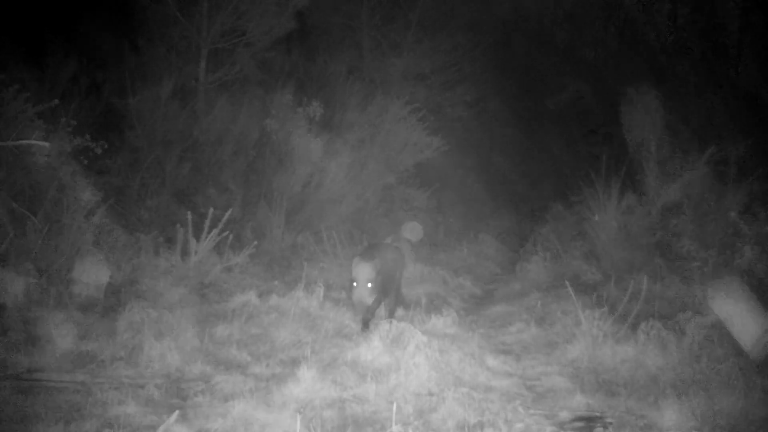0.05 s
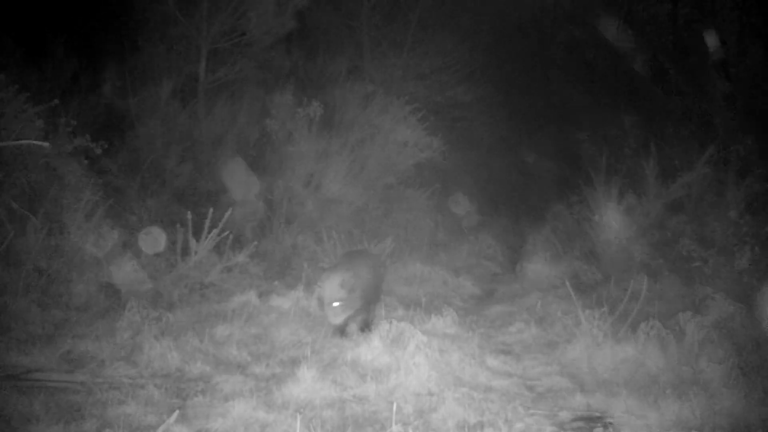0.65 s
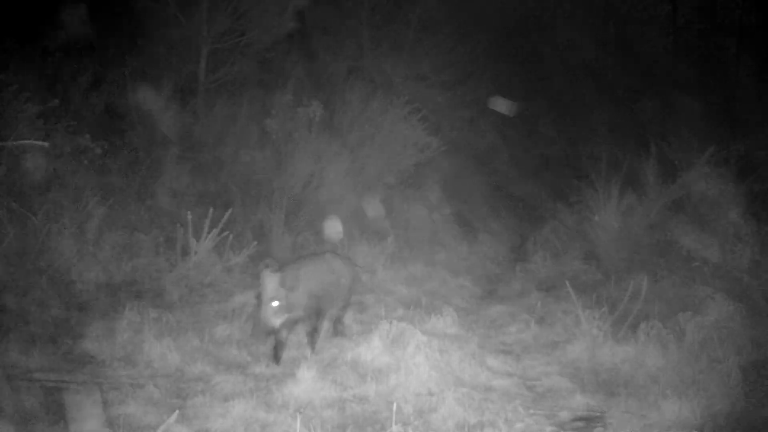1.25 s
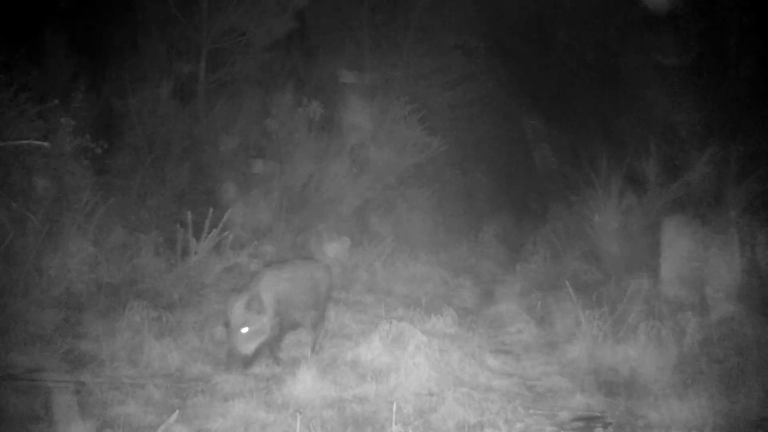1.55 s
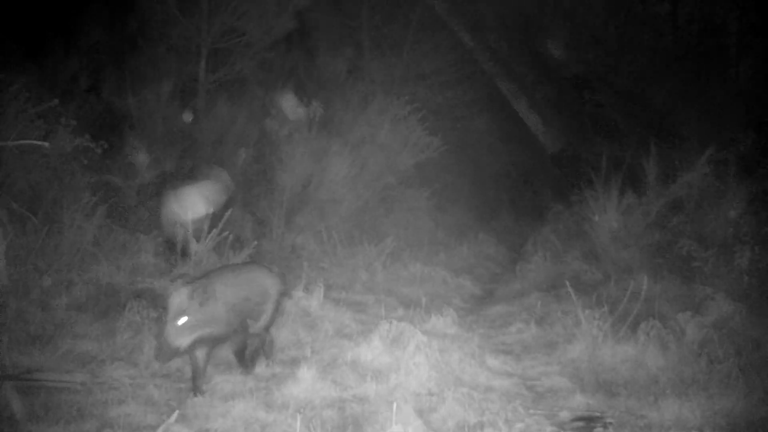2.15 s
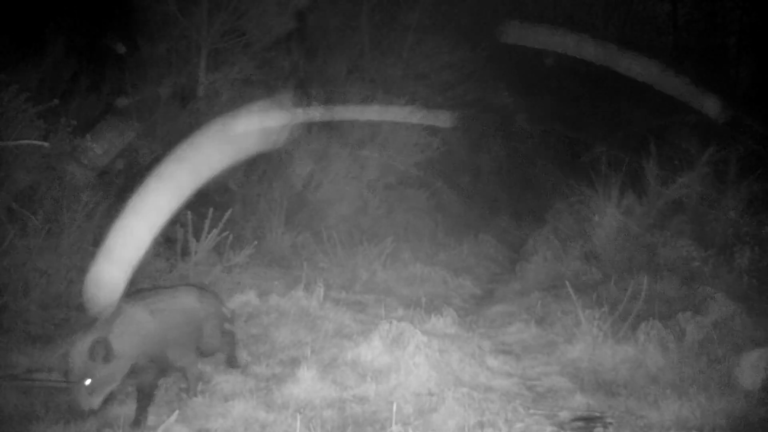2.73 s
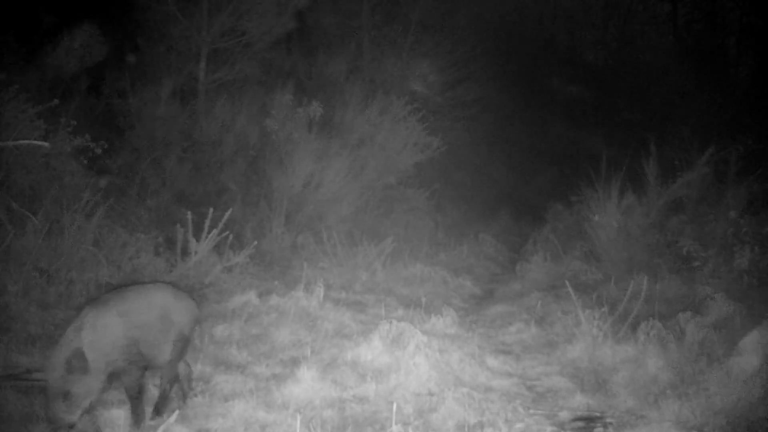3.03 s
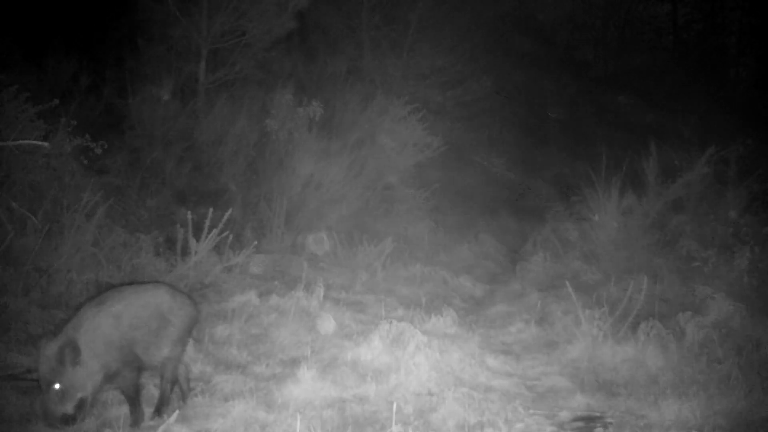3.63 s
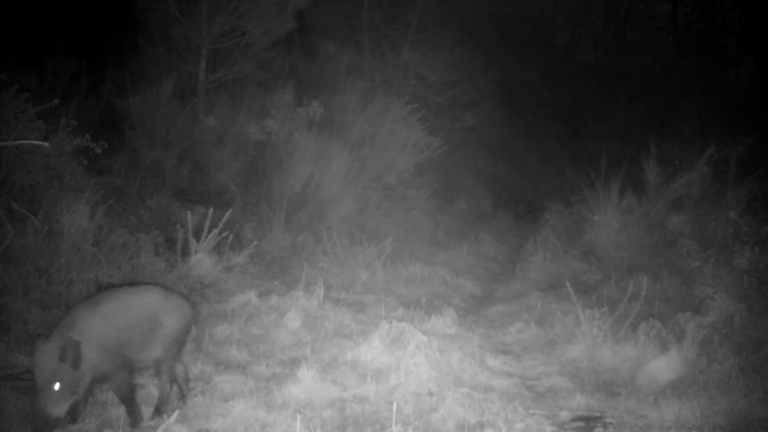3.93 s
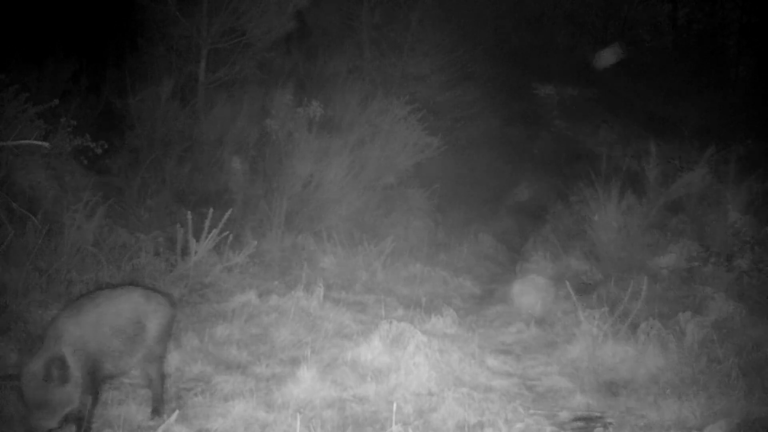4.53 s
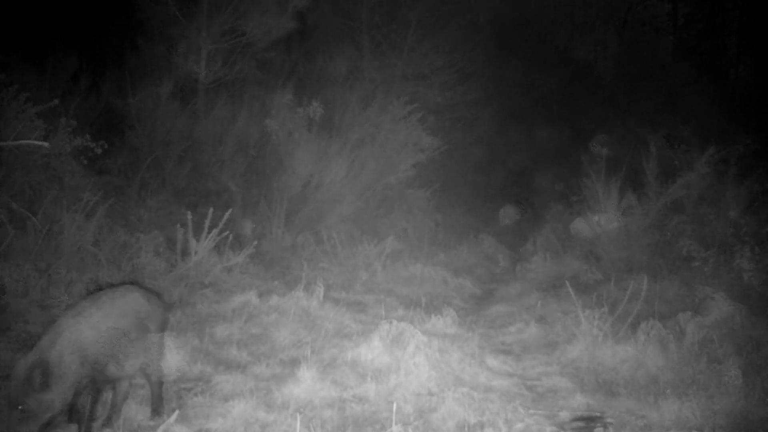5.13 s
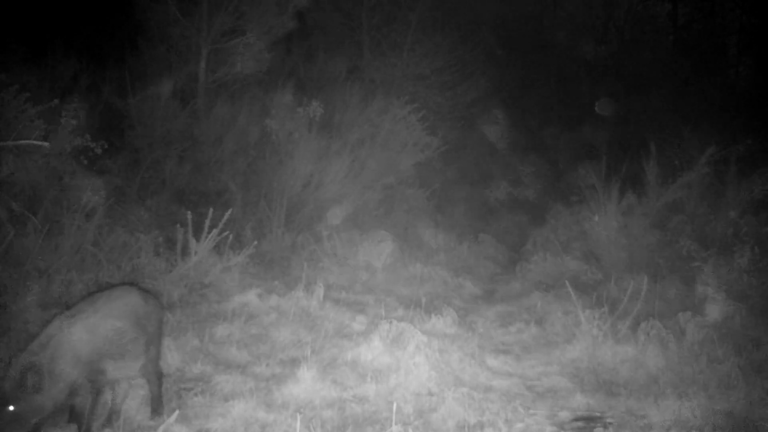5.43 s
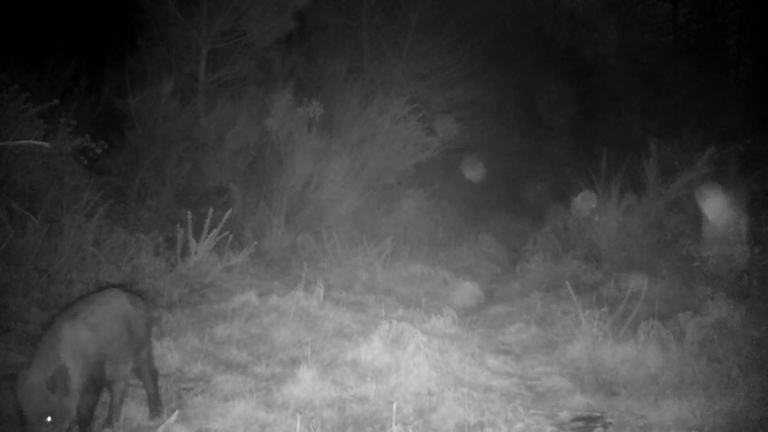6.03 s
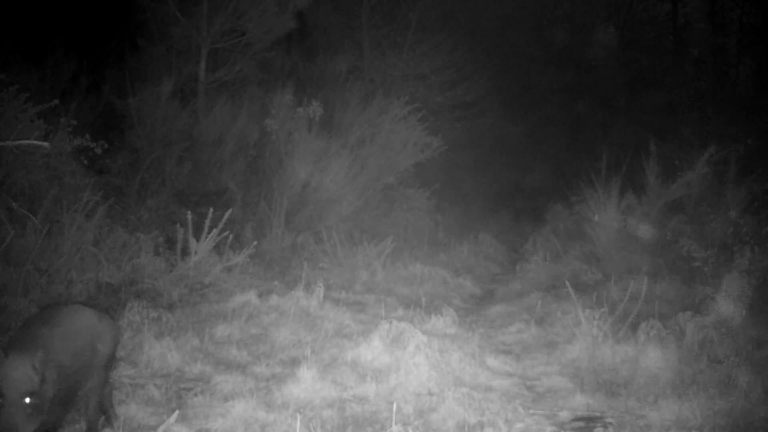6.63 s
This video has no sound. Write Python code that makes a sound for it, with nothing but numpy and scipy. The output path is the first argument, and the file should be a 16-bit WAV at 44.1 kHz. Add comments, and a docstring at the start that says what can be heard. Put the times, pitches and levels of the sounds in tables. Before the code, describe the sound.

A boar rustles through dry grass with small twig snaps, while something briefly brushes the microphone's plastic case, over steady hiss.

```python
"""Wild boar in dry grass at night.

A boar walks and roots a few metres from a trail camera: blades slip and swish, stalks snap
and ring, hooves thud on soft ground. Something small, probably a moth, stirs the air at the
microphone, then brushes the plastic case and rings its modes. The camera hisses and whines faintly."""
import sys
import numpy as np
from scipy import signal
from scipy.fft import rfft, irfft, next_fast_len
from scipy.io import wavfile

SR = 44100
rng = np.random.default_rng(int(sys.argv[2]) if len(sys.argv) > 2 else 0)


def file_out(sig):
    """Save sig as 16-bit WAV at sys.argv[1]."""
    # one column per channel
    cols = np.atleast_2d(sig).T
    # limit, then scale
    lim = np.clip(cols, -1, 1)
    pcm = np.round(lim * 32767).astype(np.int16)
    wavfile.write(sys.argv[1], SR, pcm)


N = 303055
TIME_S = np.arange(N) / SR
BAND_LIMIT_HZ = 15720

# camera hiss: freq_hz, density_db
HISS_SPECTRUM = [(20, -19), (60, -12.5), (120, -7.5), (220, -2.5), (500, 1.5), (1100, 3), (2000, -0.5),
                 (3300, -6.5), (5000, -20), (6300, -25), (7300, -37), (9000, -34.5), (15500, -36)]
# ticking dry blades: freq_hz, density_db
PRICKLE_SPECTRUM = [(300, -16), (1500, 3), (3500, -1), (5500, 3), (8000, -17), (15500, -24)]
# air stirred by wings: freq_hz, density_db
DRAUGHT_SPECTRUM = [(15, -18), (40, 3.5), (100, -0.5), (400, 5), (900, -7.5), (2500, -9), (6000, -18.5),
                    (8000, -38), (15500, -37)]
# ticks near the microphone: peak_s, level_db
WING_TICKS = [(2.055, -54), (2.41, -55), (3.55, -61), (4.28, -50), (4.857, -53), (5.824, -62), (5.87, -57),
              (6.56, -57)]
# light rubs on the case: start_s, end_s, level_db
CASE_RUBS = [(5.363, 5.41, -65), (5.46, 5.55, -59.5), (5.605, 5.84, -68.5), (6.225, 6.28, -76),
             (6.416, 6.76, -66)]
# low case modes woken by rubbing: freq_hz, nominal_width_hz, gain_db
LOW_MODES = [(80, 57, -9), (199.5, 42, 1.5), (375, 22, -4.5)]
# brushes on the case: peak_s, level_db, brightness_db, rise_s
CASE_BRUSHES = [(4.183, -33, -16, 0.0027), (4.207, -33.5, -21, 0.0036), (4.219, -32, -4.5, 0.0064),
                (4.255, -38, -14, 0.0023), (4.284, -18.5, -3.5, 0.0059), (4.3105, -31, -3, 0.0013),
                (4.329, -22, 5.5, 0.0038), (4.35, -58, -8, .004), (4.867, -28.5, -0.5, 0.0061),
                (4.89, -35, 0, 0.0074), (4.903, -32.5, -9, 0.0052), (4.928, -32.5, -6, 0.003),
                (4.9365, -36, -2.5, 0.0018)]
# plastic case modes: freq_hz, width_hz, gain_db
CASE_MODES = [(80, 70, -23), (205, 35, -18), (375, 60, -11), (560, 55, 2), (675, 65, -6), (765, 70, -6),
              (910, 70, -12), (1345, 70, 1), (1610, 110, -9), (1865, 80, -5), (2140, 130, -1),
              (2290, 110, -9)]
# contact rasp between the modes: freq_hz, density_db
RASP_SPECTRUM = [(50, -48), (130, -29), (240, -5.5), (380, -19.5), (800, 4), (1200, -7), (1700, -9),
                 (2300, -12), (2800, -12.5), (4500, -42), (8000, -62)]
# dry scuff of a brush: freq_hz, density_db
SCUFF_SPECTRUM = [(30, -29), (80, -6), (200, 2), (280, -2), (500, 0), (2300, 10.5), (2900, -10), (3600, 3),
                  (4050, 3.5), (4400, -4), (5200, -7.5), (6500, -17), (7600, -27.5), (15500, -41)]
# hooves on soft ground: start_s, level_db, pitch_hz
HOOF_FALLS = [(.937, -46, 354), (0.963, -53, 250), (0.988, -51, 189), (1.398, -48, 566), (1.417, -52, 224),
              (1.445, -47, 225), (2.861, -35, 553), (3.611, -49, 183), (3.624, -39.5, 470)]
# breaking stalks and twigs: start_s, level_db, pitch_hz
STALK_SNAPS = [(.163, -45, 1870), (0.174, -46, 2460), (.246, -41, 1710), (.363, -41, 1400),
               (.382, -44, 1510), (0.602, -48, 2500), (0.65, -55, 2780), (0.963, -42.5, 2380),
               (1.104, -50.5, 774), (1.112, -42, 1750), (1.398, -42, 954), (1.421, -49, 1930),
               (1.78, -46.5, 1650), (1.82, -47.5, 1370), (1.833, -47, 810), (1.975, -46, 1160),
               (2.052, -43, 2060), (2.205, -51, 730), (2.334, -45.5, 834), (2.535, -48.5, 837),
               (2.63, -45.5, 930), (2.861, -42.5, 800), (2.872, -43, 943), (3.123, -49.5, 1590),
               (3.162, -49.5, 1180), (3.175, -54, 1360), (3.534, -47, 1060), (3.624, -47.5, 760),
               (3.701, -54, 1710), (4.005, -51, 2000), (4.03, -46, 1130), (4.074, -46.5, 1664),
               (4.423, -47, 1900), (4.476, -53, 3380), (4.717, -45.5, 1250), (4.746, -46, 610),
               (5.092, -56.5, 2900), (5.246, -43.5, 2040), (5.5, -39, 2890), (5.529, -45.5, 1380),
               (5.727, -50.5, 1560), (5.763, -45, 1110), (5.806, -40.5, 2370)]
# grass pushed by legs and snout: start_s, end_s, level_db, centre_hz
GRASS_STROKES = [(-.02, 0.15, -45, 1930), (0.289, 0.419, -44, 1560), (0.408, 0.508, -53, 1360),
                 (0.982, 1.01, -49.5, 2200), (1.102, 1.179, -58.5, 1400), (1.191, 1.36, -53, 1200),
                 (1.398, 1.461, -54.5, 1200), (1.778, 1.866, -53.5, 1210), (1.968, 2.721, -56.5, 1100),
                 (3.448, 3.575, -55.5, 1150), (4.428, 4.451, -46, 2280), (4.747, 4.86, -53, 1540),
                 (5.209, 5.283, -52.5, 2330), (5.328, 5.42, -49.5, 1210), (5.463, 5.546, -48.5, 1180),
                 (5.568, 5.638, -46.5, 1630), (5.766, 5.886, -56.5, 1130), (5.994, 6.088, -57, 1190),
                 (6.183, 6.297, -49, 1210), (6.418, 6.609, -49.5, 1420), (6.64, 6.724, -46.5, 1650)]
# slipping blades: freq_hz, density_db
GRASS_SPECTRUM = [(59, -30), (100, -20), (134, -16), (205, -19), (264, -14), (386, -5.5), (467, -5),
                  (1550, -3), (4190, -8.5), (7250, -28), (8060, -31), (8580, -34), (15500, -43)]


def gain_of(db):
    """Decibels to amplitude."""
    return 10 ** (np.asarray(db) / 20)


def unit_rms(x):
    """Scale to rms 1."""
    return x / np.sqrt(np.mean(x ** 2) + 1e-20)


def add(mix, start_s, sound):
    """Mix in place at start_s."""
    part = mix[max(round(start_s * SR), 0):][:len(sound)]
    part += sound[:len(part)]


def coloured(x, spectrum):
    """Filter by (freq_hz, density_db) points; rms 1."""
    hz, db = np.transpose(spectrum)
    size = next_fast_len(len(x))
    curve_db = np.interp(np.log(np.fft.rfftfreq(size, 1 / SR) + 1), np.log(hz), db)
    return unit_rms(irfft(rfft(x, size) * gain_of(curve_db), size)[:len(x)])


def resonate(x, centre_hz, width_hz):
    """Unity-gain resonance; the centre may move."""
    carrier = np.exp(2j * np.pi * np.cumsum(centre_hz * np.ones(len(x))) / SR)
    pole = np.exp(-np.pi * width_hz / SR)
    return 2 * (carrier * signal.lfilter([1 - pole], [1, -pole], x / carrier + 1e-18)).real


def band(x, low_hz, high_hz, order=2):
    """Causal band-pass."""
    sos = signal.butter(order, [low_hz, min(high_hz, .45 * SR)], "band", fs=SR, output="sos")
    return signal.sosfilt(sos, x)


def band_noise(samples, low_hz, high_hz, order=2):
    """Band-passed noise; rms 1."""
    return unit_rms(band(rng.standard_normal(samples), low_hz, high_hz, order))


def grains(per_s, spread_db):
    """Random tiny slips of uneven size; rms 1."""
    size = gain_of(spread_db * np.minimum(rng.exponential(1, N), 4))
    return unit_rms(size * rng.choice([-1, 1], N) * (rng.random(N) < per_s / SR))


def swell(t, start_s, end_s, rise_s, fall_s):
    """Soft-edged gate."""
    return (1 + np.tanh((t - start_s) / rise_s / 2)) * (1 - np.tanh((t - end_s) / fall_s / 2)) / 4


def camera_hiss(level_db=-57.5):
    """Steady coloured noise."""
    return gain_of(level_db) * coloured(rng.standard_normal(N), HISS_SPECTRUM)


def camera_whine(level_db=-79, pitch_hz=7796.23, flips_per_s=59.52):
    """Thin tone whose sign flips at a steady rate."""
    polarity = np.tanh(25 * np.sin(np.pi * flips_per_s * TIME_S))
    return gain_of(level_db) * unit_rms(polarity * np.sin(2 * np.pi * pitch_hz * TIME_S))


def blade_prickle(level_db=-79):
    """Dry blades tick at random: short, faint, bright."""
    return gain_of(level_db) * coloured(grains(per_s=22, spread_db=6), PRICKLE_SPECTRUM)


def leaf_litter(count=110, fall_s=0.0021):
    """Dry leaves settle in sparse crackles; brighter ones are fainter."""
    out, t = np.zeros(N), np.arange(1024) / SR
    for when, brightness, size in rng.random((count, 3)):
        centre_hz = 1500 * 2.8 ** brightness
        level_db = -46 + 6 * size - 10 * brightness
        crackle = band_noise(len(t), centre_hz * .7, centre_hz * 1.25, order=3) * np.exp(-t / fall_s)
        add(out, when * N / SR, gain_of(level_db) * crackle)
    return out


def wing_draught(rumble_db=-57.5, crinkle_db=-89):
    """Air from the wings buffets the microphone: soft rumble, fine crinkle."""
    nearness = swell(TIME_S, start_s=1.957, end_s=2.69, rise_s=0.046, fall_s=0.035)
    rumble = coloured(grains(per_s=1500, spread_db=5), DRAUGHT_SPECTRUM)
    crinkle = unit_rms(band(grains(per_s=260, spread_db=3), 2000, 15000, order=1))
    return nearness * (gain_of(rumble_db) * rumble + gain_of(crinkle_db) * crinkle)


def wing_ticks(trim_db=-8, rise_s=0.0027, fall_s=0.004):
    """Tiny bright ticks, perhaps a wing tip on the case."""
    out, t = np.zeros(N), np.arange(-512, 1024) / SR
    touch = np.exp(np.minimum(t / rise_s, -t / fall_s))
    for peak_s, level_db in WING_TICKS:
        tick = band_noise(len(t), 3000, BAND_LIMIT_HZ, order=1) * touch
        add(out, peak_s + t[0], gain_of(level_db + trim_db) * tick)
    return out


def case_rubs(trim_db=2, rise_s=0.0073, fall_s=0.016):
    """Soft rubbing wakes only the lowest case modes."""
    force = rng.standard_normal(N)
    hum = np.zeros(N)
    for freq_hz, nominal_width_hz, gain_db in LOW_MODES:
        width_hz = 1.1 * nominal_width_hz
        mode = resonate(resonate(force, freq_hz, width_hz), freq_hz, width_hz)
        hum += gain_of(gain_db) * unit_rms(mode)
    pressure = sum(gain_of(level_db) * swell(TIME_S, start_s, end_s, rise_s, fall_s)
                   for start_s, end_s, level_db in CASE_RUBS)
    return gain_of(trim_db) * unit_rms(hum) * pressure


def case_ring(force):
    """Case response to a force on its wall; adjacent modes alternate in sign."""
    return sum((-1) ** k * gain_of(gain_db) * signal.lfilter(*signal.iirpeak(hz, hz / width_hz, SR), force)
               for k, (hz, width_hz, gain_db) in enumerate(CASE_MODES))


def brush_envelopes(hard_db=-20, hard_fall_s=0.0041, scuff_db=-8.5):
    """Push, touch and scrape envelopes, summed in power; softer brushes linger."""
    power, t = np.zeros((3, N)), np.arange(-3000, 5000) / SR
    for peak_s, level_db, brightness_db, rise_s in CASE_BRUSHES:
        fall_s = hard_fall_s * gain_of(0.5 * (hard_db - level_db))
        stroke = gain_of(level_db) * np.exp(np.minimum(t / rise_s, -t / fall_s))
        for layer, layer_db in zip(power, (0, brightness_db, scuff_db)):
            add(layer, peak_s + t[0], (gain_of(layer_db) * stroke) ** 2)
    return np.sqrt(power)


def case_brushes(wall_lead_s=0.003, wall_band_hz=(70, 1020)):
    """Brief brushes: heavy wall modes ring on; upper modes, rasp and scuff end with the contact."""
    push, touch, scrape = brush_envelopes()
    slips = grains(per_s=12000, spread_db=1)
    steady_ring = case_ring(slips)
    early_push = np.roll(push, -round(wall_lead_s * SR))  # the wall is slow to get moving
    wall = band(case_ring(slips * early_push), *wall_band_hz, order=3)
    wall *= 1.15 / np.std(band(steady_ring, *wall_band_hz, order=3))
    upper = unit_rms(band(steady_ring, 1050, 2320, order=5)) * touch
    rasp = coloured(grains(per_s=4500, spread_db=3), RASP_SPECTRUM) * push
    scuff = coloured(rng.standard_normal(N), SCUFF_SPECTRUM) * scrape
    return gain_of(-1) * wall + gain_of(-2) * upper + gain_of(-6) * rasp + scuff


def hooves(trim_db=2, grit=0.34, sag_per_s=16, decay_cycles=1.6):
    """Soil gives under a hoof: a dull thud, sinking in pitch."""
    out, t = np.zeros(N), np.arange(6000) / SR
    for start_s, level_db, pitch_hz in HOOF_FALLS:
        thud = np.sin(2 * np.pi * np.cumsum(pitch_hz * np.exp(-sag_per_s * t)) / SR)
        soil = band_noise(len(t), pitch_hz / 2, pitch_hz * 2)
        envelope = np.exp(-t * pitch_hz / decay_cycles) * (1 - np.exp(-2 * pitch_hz * t))
        add(out, start_s, gain_of(level_db + trim_db) * (thud + grit * soil) * envelope)
    return out


def faint_snaps(count=24, low_hz=870, high_hz=3020):
    """Small stalks break at random within the strokes: rows as in STALK_SNAPS."""
    pushing_s = np.concatenate([np.arange(start_s, end_s, 1 / SR) for start_s, end_s, *_ in GRASS_STROKES])
    return [(pushing_s[int(when * len(pushing_s))], -55 + 8 * size, low_hz * (high_hz / low_hz) ** pitch)
            for when, size, pitch in rng.random((count, 3))]


def stalk_snaps(ring_db=9, crunch_db=-3, crack_db=-19, crunch_s=0.0057, crack_s=0.0039,
                splinters_per_s=500, splinter_s=0.028):
    """A break cracks and rings the stalk; smaller fibres give way just after."""
    out, t = np.zeros(N), np.arange(4096) / SR
    for start_s, level_db, pitch_hz in STALK_SNAPS + faint_snaps():
        crunch_noise, crack_noise, sizes = rng.standard_normal((3, len(t)))
        breaks = 0.1 * sizes * (rng.random(len(t)) < splinters_per_s / SR) * np.exp(-t / splinter_s)
        breaks[0] = 1  # main break
        t60_s = 0.021 * (1530 / pitch_hz) ** 0.53  # thinner, higher stalks die sooner
        envelope = np.exp(-np.log(1000) * t / t60_s) * (1 - np.exp(-2 * pitch_hz * t))
        stalk = np.sin(2 * np.pi * pitch_hz * t) * envelope
        ring = signal.fftconvolve(breaks, stalk)[:len(t)]
        fibres = unit_rms(band(crunch_noise, pitch_hz * 0.48, pitch_hz * 1.6, order=3))
        crunch = fibres * np.exp(-t / crunch_s)
        crack = unit_rms(band(crack_noise, 2500, 5300, order=3)) * np.exp(-t / crack_s)
        snap = gain_of(ring_db) * ring + gain_of(crunch_db) * crunch + gain_of(crack_db) * crack
        add(out, start_s + 0.000948, gain_of(level_db) * snap)
    return out


def grass_swishes(focus=3, width_hz=600, glide=0.037, ragged_db=1.26):
    """Many blades slip at once, in tufts; each stroke swells and lets go as its centre falls."""
    slips = grains(per_s=3500, spread_db=4.5) + 0.82 * rng.standard_normal(N)
    blades = coloured(slips, GRASS_SPECTRUM)
    tufts = gain_of(ragged_db * band_noise(N, 12, 70))
    out = np.zeros(N)
    for start_s, end_s, level_db, centre_hz in GRASS_STROKES:
        span = (TIME_S > start_s - .06) & (TIME_S < end_s + .1)
        t = TIME_S[span]
        falling_hz = centre_hz * (1 + glide * np.interp(t, [start_s, end_s], [1, -1]))
        swish = unit_rms(blades[span] + focus * resonate(blades[span], falling_hz, width_hz))
        out[span] += gain_of(level_db) * swish * swell(t, start_s, end_s, rise_s=0.0095, fall_s=0.015)
    return out * unit_rms(tufts)


def scene():
    """Boar in the grass, small visitor at the camera; mono."""
    boar = grass_swishes() + leaf_litter() + stalk_snaps() + hooves()
    visitor = case_brushes() + case_rubs() + wing_draught() + wing_ticks()
    return (boar + visitor + blade_prickle())[None]


def record(dry):
    """Camera hiss and whine, then the band limit."""
    lowpass = signal.firwin(511, BAND_LIMIT_HZ, window=("kaiser", 9), fs=SR)
    return signal.oaconvolve(dry + camera_hiss() + camera_whine(), lowpass[None], "same")


dry = scene()
out = record(dry)
file_out(out)
```